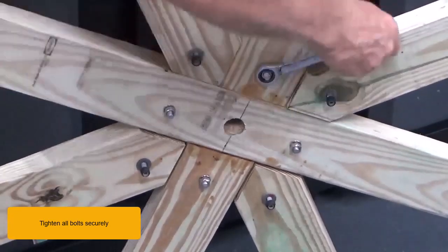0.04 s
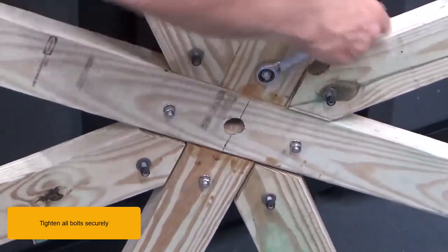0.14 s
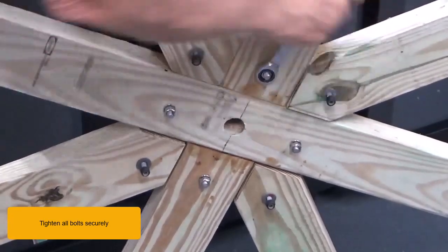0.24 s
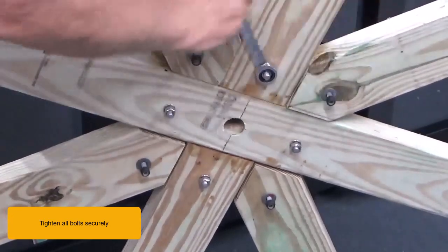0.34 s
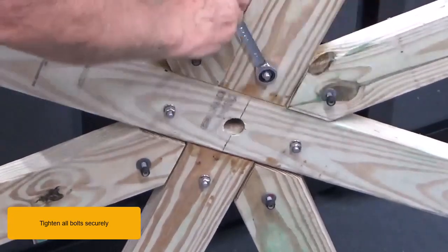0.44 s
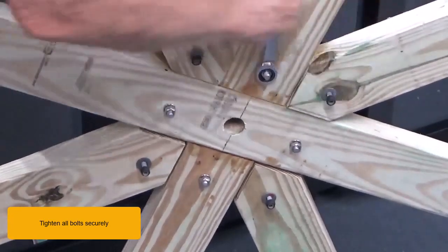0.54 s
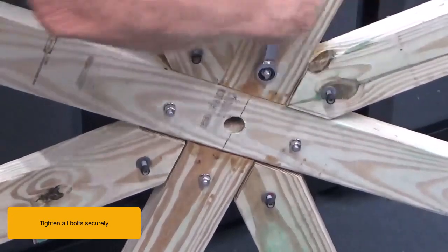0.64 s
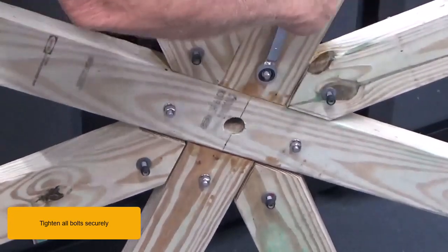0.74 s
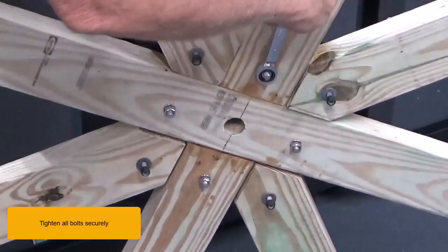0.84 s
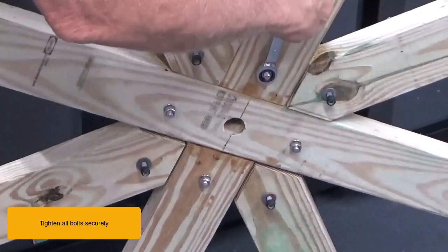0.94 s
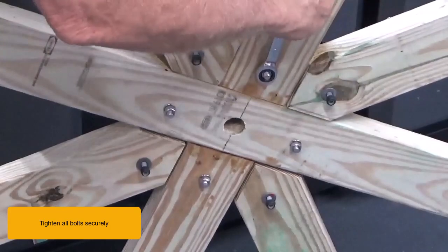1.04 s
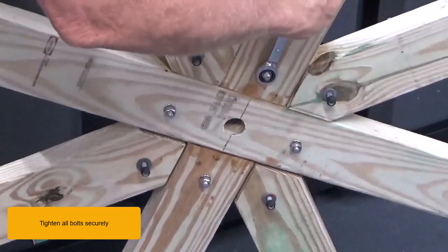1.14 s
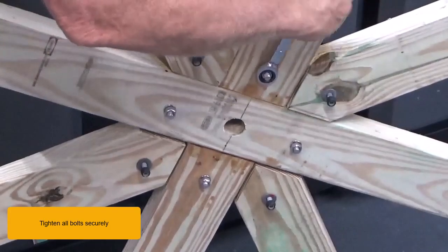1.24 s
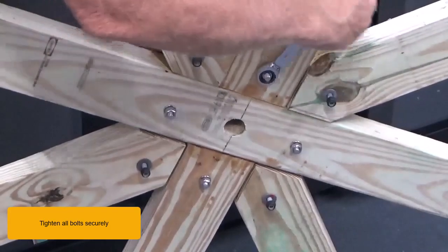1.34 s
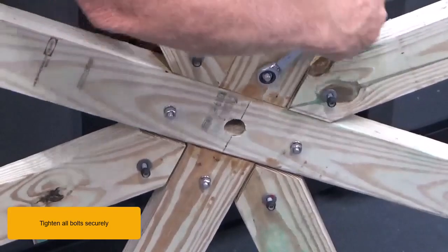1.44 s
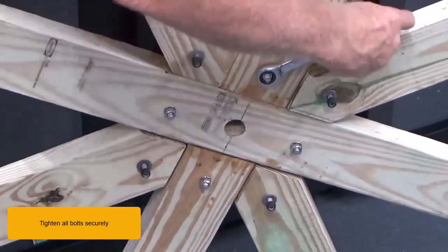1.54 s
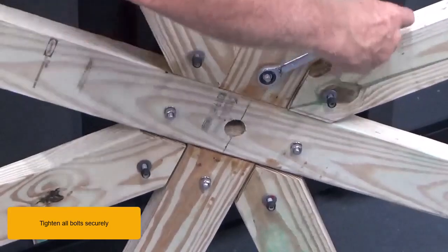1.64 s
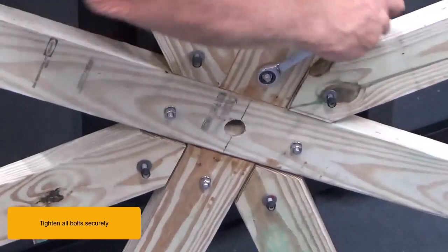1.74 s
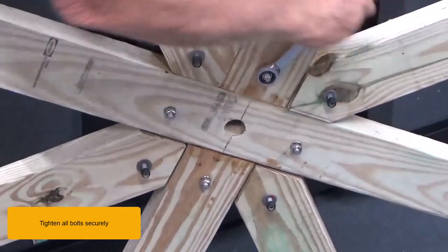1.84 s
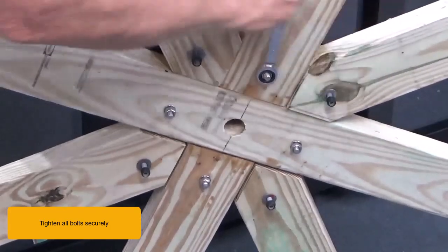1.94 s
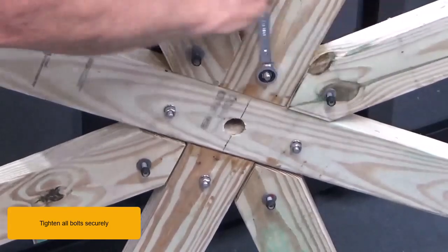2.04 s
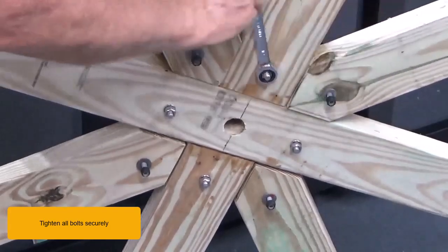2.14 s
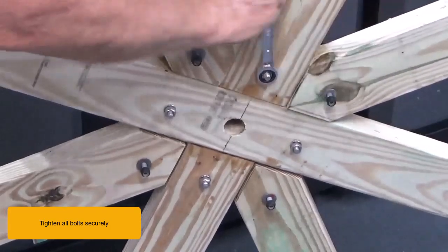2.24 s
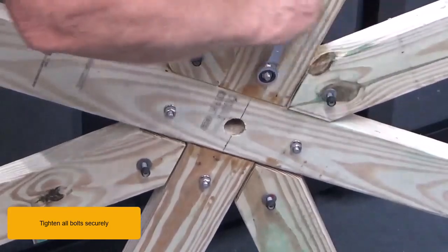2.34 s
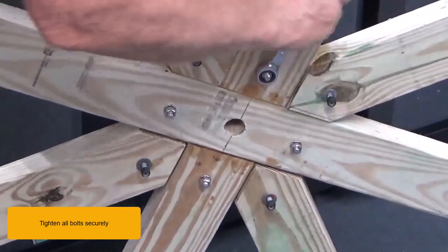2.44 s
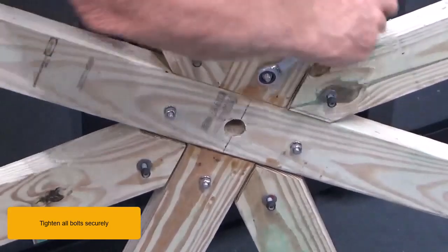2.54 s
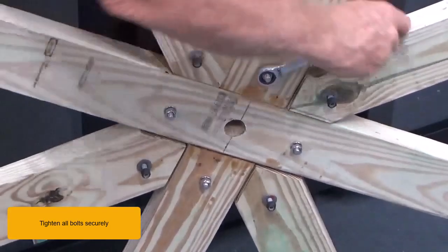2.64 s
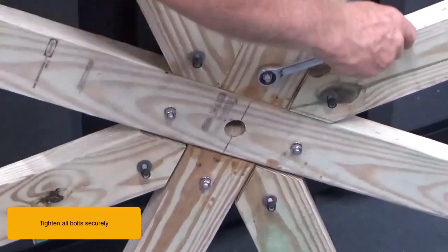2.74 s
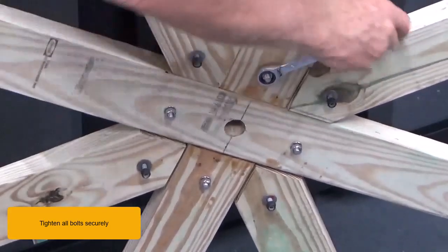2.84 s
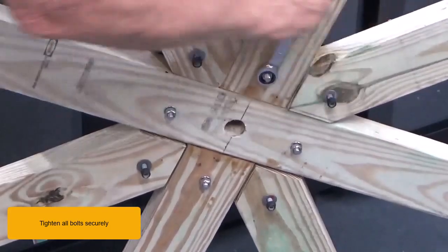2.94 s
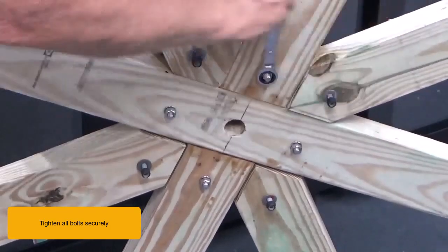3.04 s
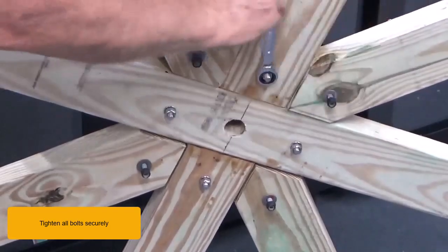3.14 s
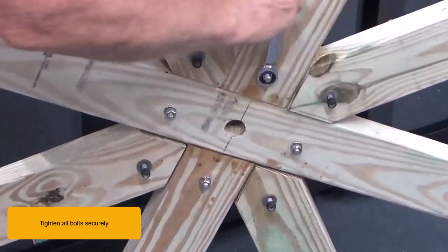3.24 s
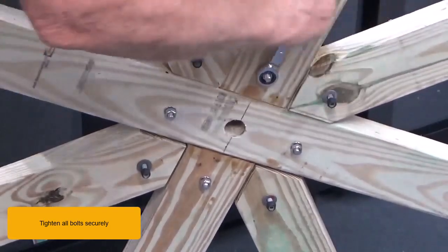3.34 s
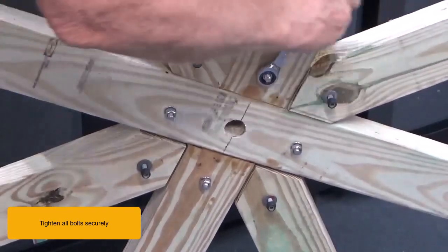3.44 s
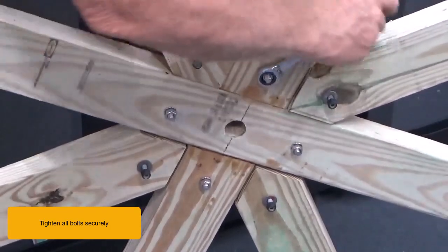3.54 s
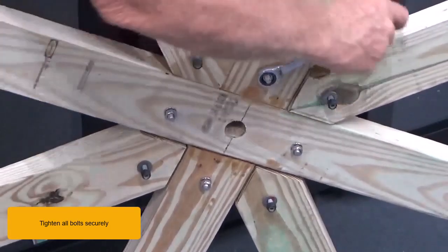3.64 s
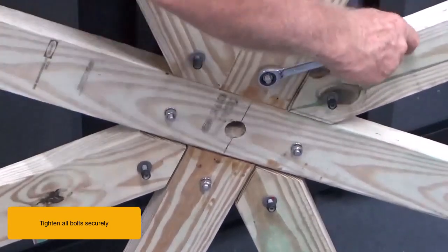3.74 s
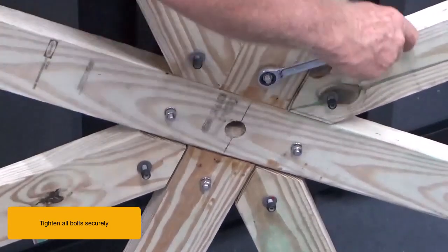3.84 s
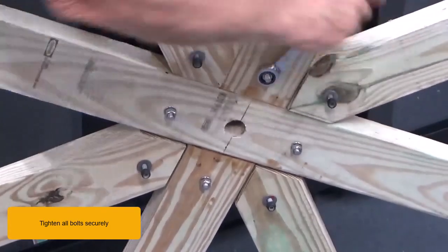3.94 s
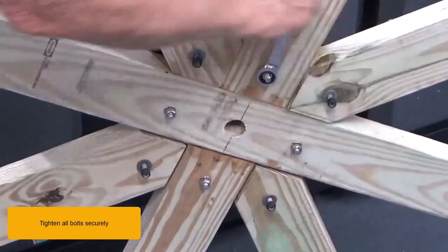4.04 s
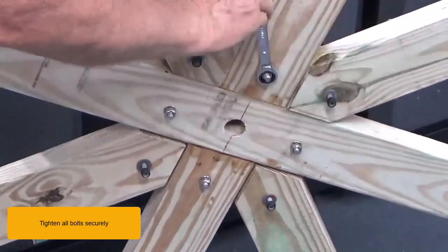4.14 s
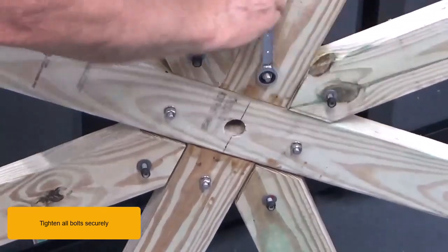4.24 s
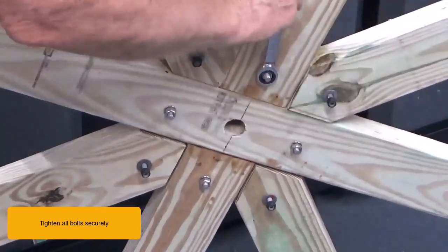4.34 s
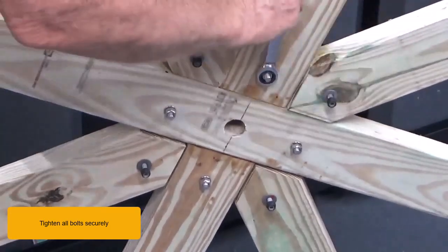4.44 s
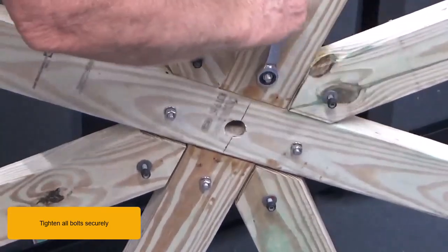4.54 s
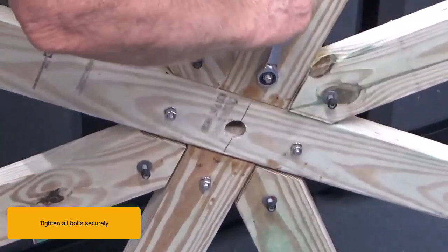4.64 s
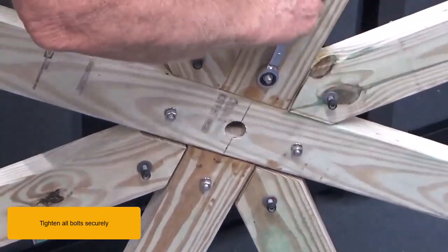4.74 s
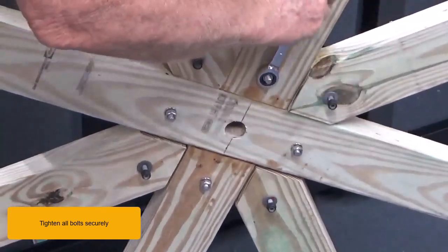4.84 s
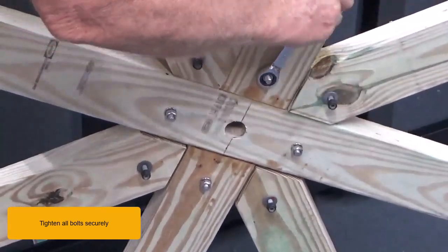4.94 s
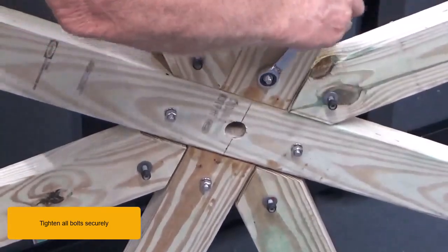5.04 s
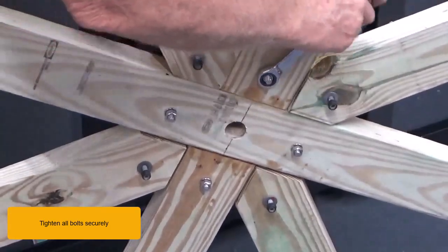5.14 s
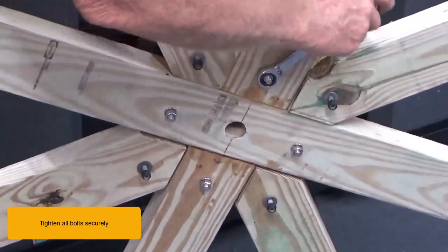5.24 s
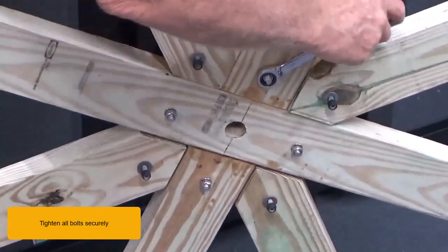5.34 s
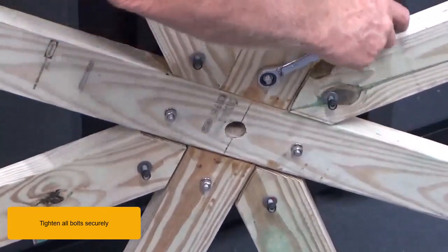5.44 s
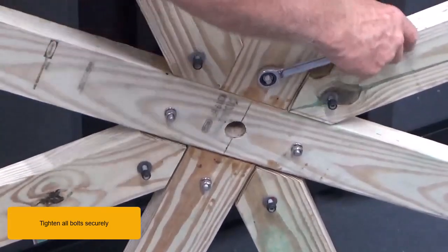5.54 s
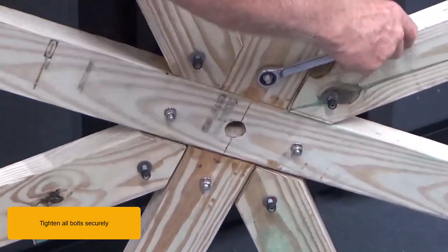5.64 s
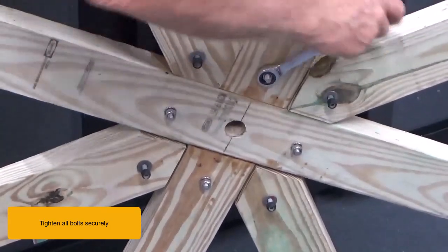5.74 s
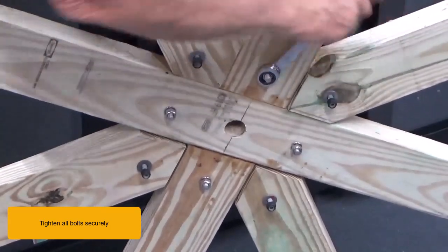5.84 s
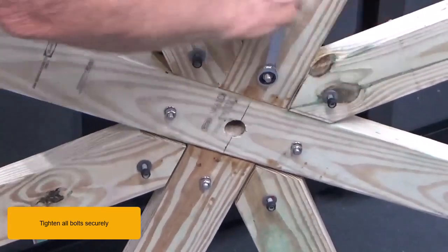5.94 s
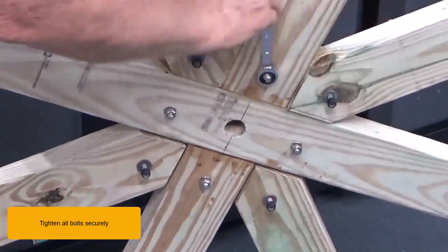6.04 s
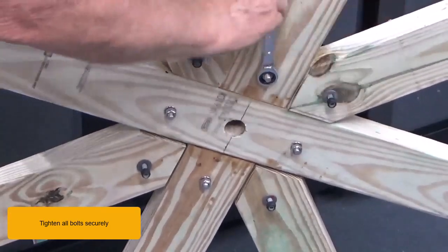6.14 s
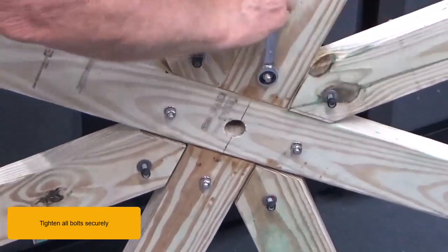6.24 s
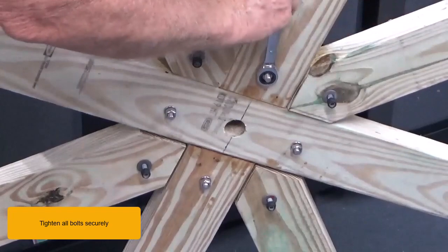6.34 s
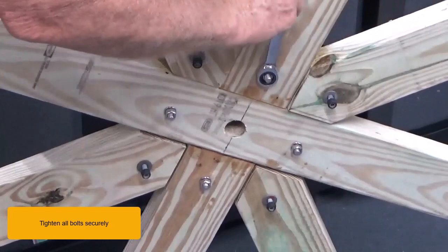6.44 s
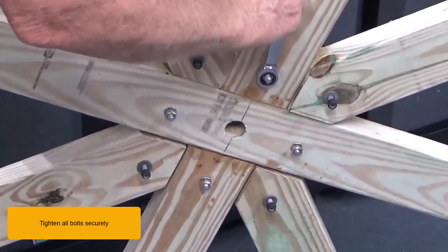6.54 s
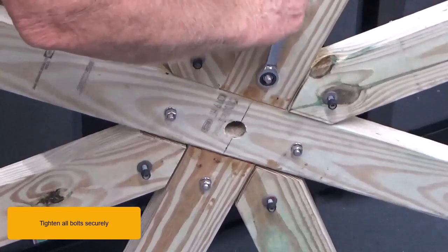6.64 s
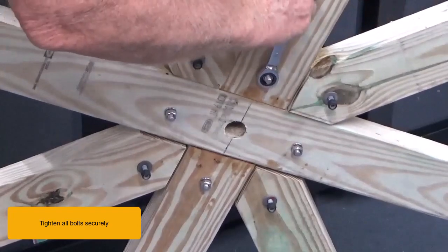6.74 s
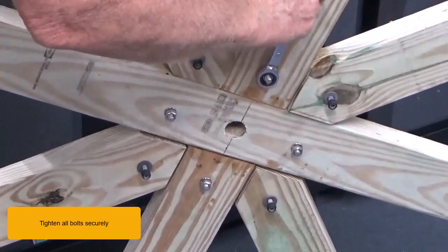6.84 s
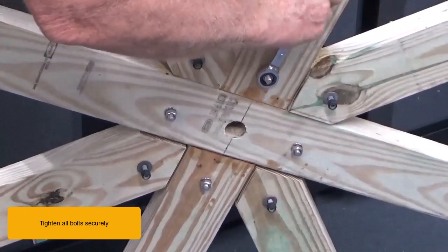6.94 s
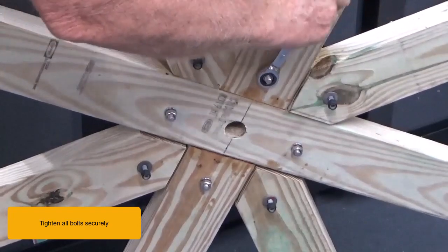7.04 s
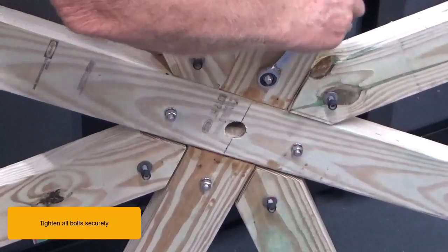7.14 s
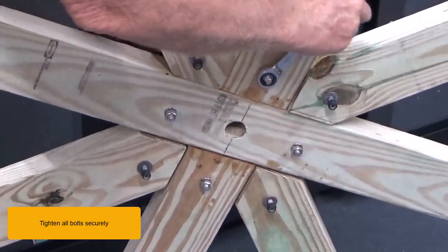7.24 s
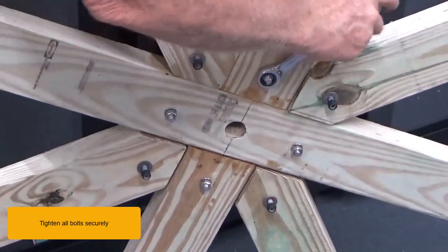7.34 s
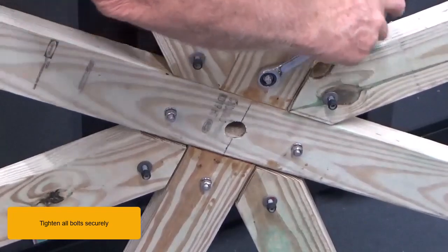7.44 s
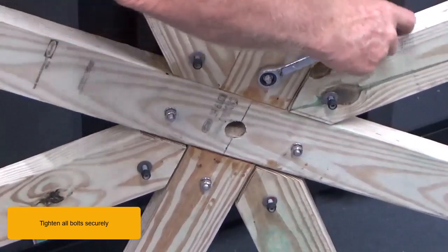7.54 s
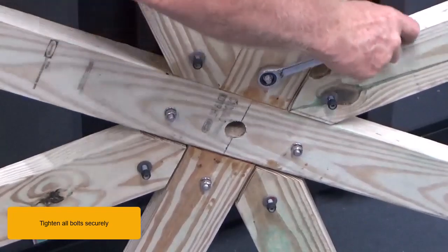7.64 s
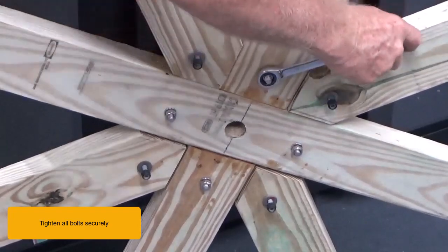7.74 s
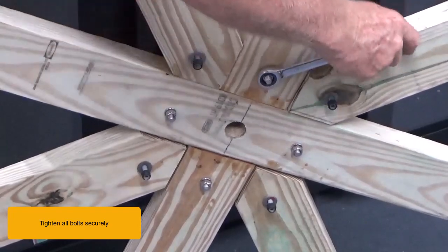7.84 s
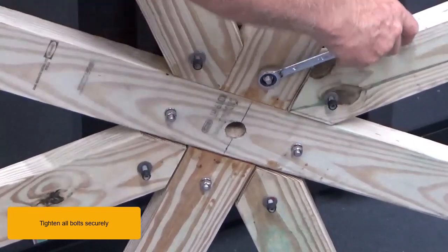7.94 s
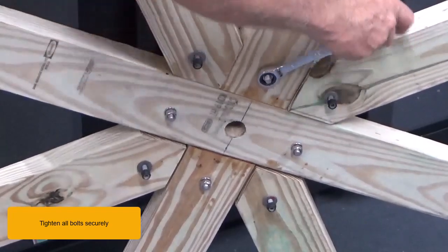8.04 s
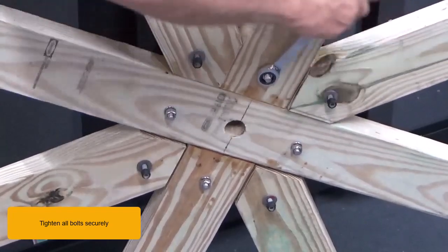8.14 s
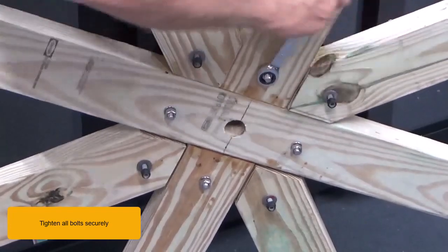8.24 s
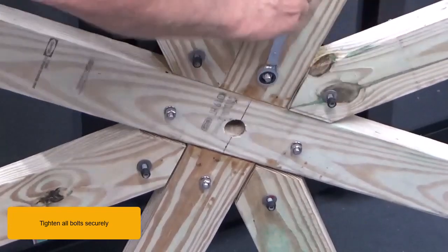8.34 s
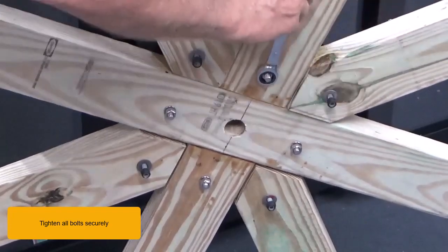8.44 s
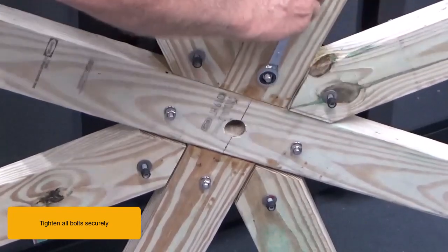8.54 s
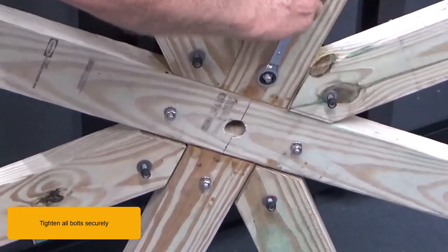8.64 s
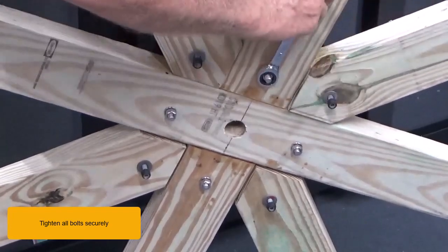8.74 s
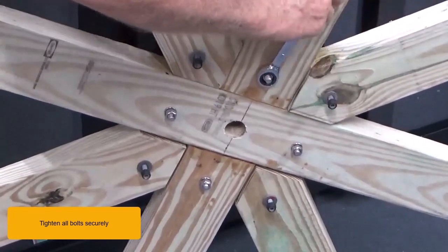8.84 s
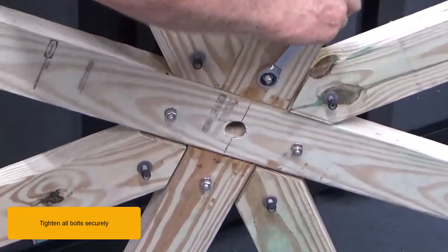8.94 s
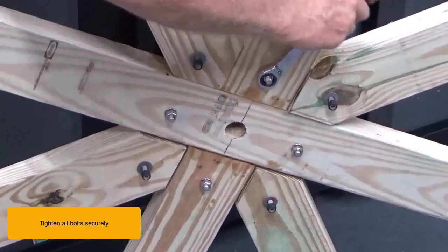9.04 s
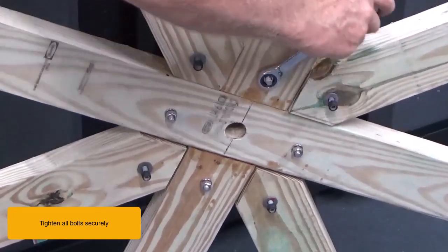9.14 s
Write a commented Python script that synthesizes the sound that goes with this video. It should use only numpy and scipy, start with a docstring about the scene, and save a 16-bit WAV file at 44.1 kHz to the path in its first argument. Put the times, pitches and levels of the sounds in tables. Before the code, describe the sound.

A ratchet spanner clicks through six fast, bright metallic bursts on a nut in a timber frame, with long quiet pauses in a softly hissing workshop.

```python
"""Room hiss and the faint ticks of a camera's lens drive open the scene: filtered noise and small ringing steps.
Slack knocks rattle timber and handle, then a ratchet spanner swings back on a nut in a timber frame, six times in all.
At each strike of the pawl head, handle and timber ring as decaying sines, and a bare workshop answers in echoes.
Before the fifth swing a sleeve brushes by as bright noise; after it something far rolls past as low noise."""
import sys
import numpy as np
from scipy import signal
from scipy.io import wavfile

SR = 44100
rng = np.random.default_rng(int(sys.argv[2]) if len(sys.argv) > 2 else 0)


def dump(signal):
    """Clip the signal to [-1, 1] and save it as 16-bit WAV at the path in sys.argv[1]."""
    limited = np.clip(np.atleast_2d(signal).T, -1, 1)
    pcm = np.round(limited * 32767).astype(np.int16)
    wavfile.write(sys.argv[1], SR, pcm)


N = 405719

# Room and microphone hiss, relative colour: pitch_hz, level_db (per Hz)
HISS_COLOUR = [(12, -30), (20, -10.5), (92, -8.5), (178, -6.5), (294, -7), (354, -6.5), (915, -8),
               (1020, -9.5), (3330, -13), (10900, -18), (14200, -48.5), (22000, -120)]
# Fan bands that lift the hiss: pitch_hz, width_hz, lift_db
FAN_BANDS = [(64, 12, 7), (914, 36, 6.5), (1370, 230, 2.5)]
# How alike left and right hiss are: pitch_hz, likeness (0 to 1)
HISS_LIKENESS = [(60, 1), (220, 0.89), (840, 0.66), (3120, 0.73), (11600, 0.91)]
# Resonances of the lens drive: pitch_hz, level_db (relative), t60_s
LENS_MODES = [(3370, -4.5, 0.029), (2585, -8, 0.026), (5900, -5.5, .005), (9900, -5.5, 0.0043)]
# When the lens drive runs: start_s, end_s
LENS_RUNS = [(0, 1.34), (1.68, 8.6), (9.15, 9.2)]
# Jolts as the drive stops and starts: start_s, level_db
LENS_JOLTS = [(1.354, -47), (1.672, -51), (8.611, -45.5), (9.146, -51)]
# Slack taken up or the frame settling, before fades: start_s, timber_db, timber_hz (centre), handle_db,
# length_s (of the rattle, nominal)
KNOCKS = [(.093, -38.5, 1170, -45.5, 0.017), (0.45, -38.5, 1510, -51, .004),
          (0.544, -48.5, 195, -51.5, 0.0099), (.595, -53, 228, -50.5, .01), (1.686, -40, 1230, -47.5, .035),
          (2.794, -47, 1600, -50, 0.0067), (2.816, -42, 1430, -54.5, 0.023),
          (3.165, -44, 1230, -48.5, 0.0045), (3.241, -46, 1000, -46.5, .015),
          (3.852, -37.5, 1720, -43.5, 0.00798), (3.865, -36.5, 1040, -44, 0.0064),
          (5.68, -46.5, 1140, -55, .03), (5.912, -45.5, 504, -72, 0.065), (7.901, -48, 990, -56, 0.092)]
# Resonances of the timber frame: pitch_hz (nominal), level_db (relative), t60_s
TIMBER_MODES = [(250, 6.5, 0.012), (520.5, 1.5, 0.063), (717, 3.5, 0.018), (949, 0.5, 0.035),
                (1119, -7.5, 0.094), (1309, -5, 0.037), (1676, 2, 0.034), (1889, 1.5, 0.048),
                (2278, -4, 0.081)]
# Resonances of the spanner handle: pitch_hz (nominal), level_db (relative), t60_s
HANDLE_MODES = [(2614, -3.5, 0.024), (2953, -1, 0.021), (3318, 3, 0.012), (3716, 0, 0.016),
                (4180, 0, 0.0097), (4580, -4.5, 0.024), (5076, 0, 0.005), (5350, 0.5, 0.0093),
                (5874, 0, 0.0084), (6384, 8.5, 0.0082), (7190, 1, 0.012)]
# Resonances of the ratchet head: pitch_hz (nominal), level_db (relative), t60_s
HEAD_MODES = [(7480, -9.5, 0.029), (8400, -1, 0.0064), (8800, -2, 0.0053), (9390, -2.5, 0.0065),
              (9806, -1, 0.0078), (10470, -0.5, 0.0042), (10300, -2.5, 0.002)]
# Early echoes off beams, floor and ceiling: delay_s, level_db (relative to the direct sound)
ECHOES = [(.0036, -8), (.006, -16.5), (.013, -14), (.02, -15.5)]
# How long the workshop rings: pitch_hz, t60_s
ROOM_DECAY = [(300, 0.46), (900, 0.77), (2800, 0.53), (7000, 0.45), (11000, 0.27)]
# Pawl strikes, one row each; close pairs in the first swing are bounces: start_s, head_db, handle_db
STRIKES = [(0.1442, -41, -26.5), (.1466, -28, -52), (.161, -38, -34), (0.1645, -19, -30), (.176, -39, -25),
           (0.1778, -29, -29), (0.1897, -23, -26.5), (0.2023, -20.5, -23.5), (.214, -23, -21),
           (0.2266, -28, -26), (0.238, -26, -30), (0.2484, -28.5, -29), (.259, -23, -21.5),
           (0.2699, -30, -21.5), (.2809, -26, -27.5), (0.2945, -25.5, -24), (.3098, -34, -32),
           (0.3223, -28.5, -27.5), (0.3381, -26.5, -27.5), (0.3572, -31, -29), (1.7703, -34.5, -28.5),
           (1.799, -32, -27), (1.8242, -28, -26.5), (1.8466, -24, -27), (1.8699, -25.5, -25.5),
           (1.892, -21.5, -34.5), (1.913, -21, -26), (1.935, -27, -26), (1.9569, -21.5, -28.5),
           (1.977, -21.5, -28), (2.001, -33, -29.5), (2.0263, -25, -31), (2.062, -30, -33),
           (2.8435, -25, -26.5), (2.863, -27.5, -29), (2.8778, -25.5, -27.5), (2.8931, -28.5, -25.5),
           (2.9081, -28, -23.5), (2.923, -25.5, -22.5), (2.9376, -24, -25), (2.9538, -23, -25),
           (2.9676, -26, -30), (2.986, -28, -23.5), (3.0044, -19, -25.5), (3.0275, -22, -26.5),
           (3.056, -28.5, -29.5), (3.8976, -23.5, -28), (3.9164, -24, -23), (3.933, -22.5, -26),
           (3.947, -30.5, -23), (3.9615, -19.5, -24.5), (3.9752, -23.5, -24), (3.9906, -17.5, -19.5),
           (4.0054, -18.5, -23.5), (4.0214, -20, -27.5), (4.036, -16, -19.5), (4.0536, -26, -28.5),
           (4.0723, -22.5, -26.5), (4.0959, -18.5, -23.5), (4.1356, -22.5, -22), (5.7492, -21.5, -24),
           (5.7732, -23.5, -24), (5.7969, -24, -22), (5.818, -22.5, -22), (5.8406, -25, -24.5),
           (5.8622, -23.5, -21.5), (5.883, -21, -25.5), (5.9055, -22, -26), (5.9293, -20, -34),
           (5.9526, -22.5, -28.5), (5.975, -27.5, -32.5), (6.0014, -21.5, -30), (6.0396, -24, -29),
           (8.0368, -23, -22.5), (8.07, -26, -24), (8.0989, -20, -23.5), (8.1266, -36, -27.5),
           (8.1566, -23.5, -26), (8.187, -29.5, -27.5), (8.219, -26.5, -28), (8.2502, -26.5, -29),
           (8.2863, -26.5, -30), (8.3487, -30, -27)]
# Swings; grip and angle move the centres: start_s, length_s, handle_hz at start, middle and end,
# timber_db (in the middle), timber_hz at start, middle and end
SWINGS = [(.145, 0.19, 4740, 3860, 4700, -31.5, 1750, 1440, 1140),
          (1.77, 0.24, 5070, 5100, 4630, -37.5, 1380, 1740, 1550),
          (2.843, 0.28, 5450, 4530, 4960, -35.5, 1850, 1540, 1200),
          (3.898, 0.22, 5430, 4170, 5170, -33, 1710, 1130, 1070),
          (5.749, 0.25, 5280, 5470, 4840, -36.5, 2180, 1680, 1400),
          (8.037, 0.32, 5000, 4400, 5940, -36, 1400, 1720, 2030)]
# A sleeve brushes, swell and fade: time_s, level_db
SLEEVE_CURVE = [(5.38, -87), (5.502, -55.5), (5.66, -72)]
# Something far rolls by, swell and fade: time_s, level_db
ROLLING_CURVE = [(6.1, -70), (6.794, -63.5), (7.2, -73)]
# Treble roll-off of the whole mix, a steep slope above 11 kHz: pitch_hz, level_db
TREBLE_EDGE = [(10950, -1.5), (11150, -13), (11500, -27), (12100, -43)]

HISS_DB, HISS_TOP_HZ = -54, 11020
LENS_PER_S, LENS_FIRST_S = 29.972, .0275
CREEP_DB_PER_S = -250  # the longer a rattle, the softer its first blows
TURNS_PER_S = 9  # half-turns of a steady rotation among three random tails: the echo colour keeps shifting
HEAD_HZ, HEAD_SCATTER, HANDLE_SCATTER = 9540, .031, .044  # no two strikes land alike: share of the centre
TIMBER_START_DB, TIMBER_END_DB = -2.5, -4.5  # relative to mid-swing, where the frame shakes most
EDGE_HZ = 12250  # nothing passes above this pitch


def gain_of(db):
    """Turn decibels into an amplitude factor."""
    return 10 ** (np.asarray(db) / 20)


def evened(x):
    """Bring a sound to an rms of one."""
    return x / np.sqrt(np.mean(x ** 2) + 1e-20)


def read(points, hz):
    """Read a curve between its points, along a logarithmic pitch axis."""
    point_hz, value = np.transpose(points)
    return np.interp(np.log(hz + 1), np.log(point_hz + 1), value)


def add(mix, start_s, sound):
    """Lay a sound into the mix, cut off at the end."""
    part = mix[round(start_s * SR):][:len(sound)]
    part += sound[:len(part)]


def ring(modes, db, centre_hz=None, octaves=.5, spread_db=2.5, detune=.022, rise_turns=1.46,
         most_db=13, in_step=False):
    """One blow: each mode is a close trio of decaying sines, struck a little differently every time."""
    hz, mode_db, t60 = np.transpose(modes * 3)[:, :, None]
    pitch_luck, level_luck, sign_luck = rng.standard_normal((3, len(hz), 1))
    t = np.arange(max(t60.max(), .008) * SR) / SR
    if centre_hz:  # modes far from the centre are driven less, by most_db at the limit
        distance = np.log2(hz / centre_hz) / octaves
        mode_db = mode_db - np.minimum(6 * distance ** 2, most_db)
    # The contact lasts a moment, so no bass thud leaves the steel
    rise = 1 - np.exp(-(hz * t / rise_turns) ** 2)
    # Modes that start in step bunch into one sharp crack
    sign = 1 if in_step else np.sign(sign_luck)
    tones = rise * sign * np.sin(2 * np.pi * hz * (1 + detune * pitch_luck) * t)
    decay = gain_of(mode_db + spread_db * level_luck - 60 * t / t60)
    sound = (decay * tones).sum(axis=0)
    strike_rms = np.sqrt(np.mean(sound[:SR // 125] ** 2))  # db sets the rms of the first 8 ms
    return gain_of(db) * sound / strike_rms


def hiss():
    """Room air and microphone noise: random short-time spectra, partly shared by both channels."""
    frames, hz = N // 512 + 5, np.fft.rfftfreq(2048, 1 / SR)
    a, b, c, d = rng.standard_normal((frames, 1025, 4)).T
    db = read(HISS_COLOUR, hz)
    for fan_hz, width_hz, lift_db in FAN_BANDS:
        db = db + lift_db * np.exp(-((hz - fan_hz) / width_hz) ** 2)
    likeness = np.clip(read(HISS_LIKENESS, hz), 0, 1)
    apart = np.sqrt((1 - likeness) / 2)[:, None]
    mid = np.sqrt(1 - apart ** 2) * (a + 1j * b)
    side = apart * (c + 1j * d)
    colour = gain_of(db) * (hz < HISS_TOP_HZ)
    spectra = np.array([mid + side, mid - side]) * colour[:, None]
    noise = signal.istft(spectra, nperseg=2048, noverlap=1536)[1][:, :N]
    return gain_of(HISS_DB) * evened(noise)


def lens_drive():
    """The drive steps about 30 times a second, weak and strong in turn, and jolts at each stop or start."""
    out = np.zeros(N)
    ticks = []
    for k, s in enumerate(np.arange(LENS_FIRST_S, N / SR, 1 / LENS_PER_S)):
        if any(on < s < off for on, off in LENS_RUNS):
            ticks.append((s, -64 + 6 * (k % 2)))
    for s, db in ticks + LENS_JOLTS:
        add(out, s, ring(LENS_MODES, db, spread_db=1, detune=.01, rise_turns=.6, in_step=True))
    return out


def knocks():
    """Play in the socket closes as a short rattle of five blows on timber and handle."""
    out = np.zeros(N)
    for s, timber_db, timber_hz, handle_db, length in KNOCKS:
        for late in np.linspace(0, 1, num=5) ** 1.3:  # the gaps tend to widen
            at = s + late * length * rng.uniform(.85, 1)
            fade_db = -6 * late + CREEP_DB_PER_S * length * (1 - late) ** 4
            timber = ring(TIMBER_MODES, timber_db + fade_db, timber_hz, octaves=.67, detune=.0517,
                          rise_turns=.73, most_db=31)
            handle = ring(HANDLE_MODES, handle_db + fade_db, 3970, octaves=.54, rise_turns=.58, in_step=True)
            add(out, at, timber)
            add(out, at, handle)
    return out


def workshop(x):
    """Single early echoes, then sparse taps of random sign, each band dying at its own speed.
    Walls differ per side, and three such tails take turns."""
    early, taps = np.zeros(SR // 20), np.zeros((6, SR))
    for delay_s, db in ECHOES:
        early[round(delay_s * SR)] = gain_of(db) * rng.choice([-1, 1])
    # One tap at a random place in every ten samples
    at = np.arange(200, SR - 10, 10) + rng.integers(0, 10, (6, (SR - 201) // 10))
    np.put_along_axis(taps, at, rng.choice([-1., 1.], at.shape), 1)
    hz, t, spectra = signal.stft(taps, SR, nperseg=256)
    decay = gain_of(-60 * t / read(ROOM_DECAY, hz)[:, None])
    walls = signal.istft(spectra * decay, SR, nperseg=256)[1]
    out = np.tile(x + signal.oaconvolve(x, early)[:N], (2, 1))
    turns = TURNS_PER_S * np.arange(N) / SR
    for k, (common, sideways) in enumerate(zip(walls[::2], walls[1::2])):
        share = np.sqrt(2 / 3) * np.cos(np.pi * (turns + k / 3))  # the three powers always sum to one
        stereo = common + np.outer([1, -1], gain_of(-11.5) * sideways)
        tails = gain_of(-5) * stereo / np.linalg.norm(common)
        out = out + signal.oaconvolve(share * x[None], tails, axes=1)[:, :N]
    return out


def ratchet():
    """The pawl scrapes off the tooth tip and lands; the shock reaches the timber through the loose socket."""
    out, starts = np.zeros(N), np.transpose(SWINGS)[0]
    for s, head_db, handle_db in STRIKES:
        head_luck, handle_luck = rng.standard_normal(2)
        start, length, *swing = SWINGS[np.argmin(abs(starts - s))]
        grip_hz, frame_db, frame_hz = swing[:3], swing[3], swing[4:]
        done = (s - start) / length  # share of the swing
        head_hz = HEAD_HZ * (1 + HEAD_SCATTER * head_luck)
        handle_hz = np.interp(done, [0, .5, 1], grip_hz) * (1 + HANDLE_SCATTER * handle_luck)
        timber_hz = np.interp(done, [0, .5, 1], frame_hz)
        edge_db = TIMBER_START_DB if done < .5 else TIMBER_END_DB
        timber_db = frame_db + edge_db * (2 * done - 1) ** 2

        scrape = ring(HEAD_MODES, head_db - 12)
        head = ring(HEAD_MODES, head_db, head_hz, octaves=.17, detune=.018, rise_turns=2.77, in_step=True)
        handle = ring(HANDLE_MODES, handle_db, handle_hz, octaves=.44, detune=.029)
        timber = ring(TIMBER_MODES, timber_db, timber_hz, octaves=.64, detune=.03, most_db=16.5)
        add(out, s - .0012, scrape)
        add(out, s, head)
        add(out, s + .0003, handle)
        add(out, s + .0008, timber)
        for late in rng.uniform(.002, .012, size=3):  # the pawl chatters on its spring
            add(out, s + late, ring(HANDLE_MODES, handle_db - 20.5, handle_hz, octaves=.68))
    return out


def passing(curve, low_hz, high_hz):
    """A band of noise that swells and fades along its curve."""
    s, db = np.transpose(curve)
    band_filter = signal.butter(2, [low_hz, high_hz], "bandpass", fs=SR, output="sos")
    band = signal.sosfilt(band_filter, rng.standard_normal(N))
    level_db = np.interp(np.arange(N) / SR, s, db, -120, -120)
    return evened(band) * gain_of(level_db)


def sleeve():
    """Cloth brushing by is a short swell of bright noise."""
    return passing(SLEEVE_CURVE, 4000, 14000)


def far_rolling():
    """Something far rolling by is a slow swell of low noise."""
    return passing(ROLLING_CURVE, 112, 182)


def scene():
    """Only the knocks and the ratchet excite the workshop echoes."""
    background = hiss() + lens_drive()
    work = workshop(knocks() + ratchet())
    return background + work + sleeve() + far_rolling()


def record(dry):
    """Treble roll-off and band limit of the whole mix, over the converter's faint noise."""
    hz = np.linspace(0, SR / 2, num=2049)
    response = gain_of(read(TREBLE_EDGE, hz)) * (hz < EDGE_HZ)
    colour = signal.firwin2(1023, hz, response, window=("kaiser", 8), fs=SR)
    converter_noise = gain_of(-104) * rng.standard_normal(dry.shape)
    return signal.oaconvolve(dry, colour[None], "same") + converter_noise


dry = scene()
out = record(dry)
dump(out)
```